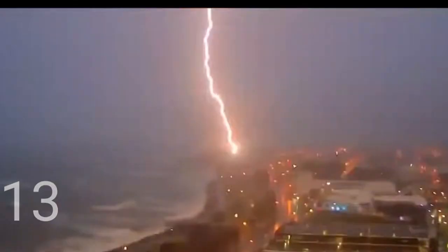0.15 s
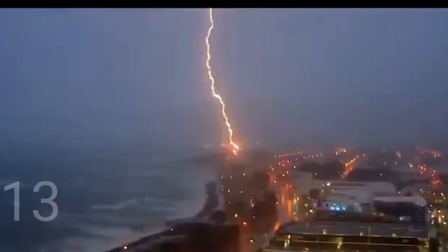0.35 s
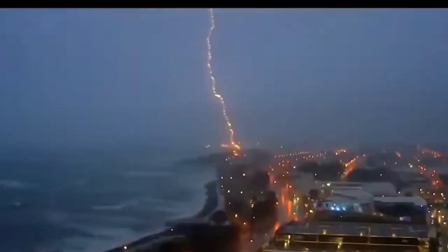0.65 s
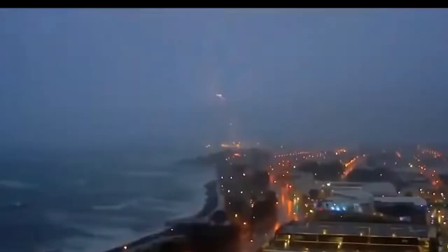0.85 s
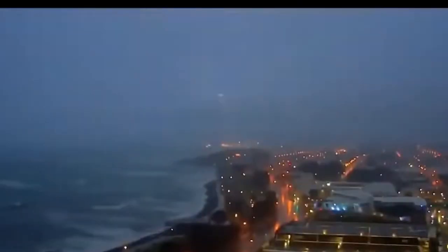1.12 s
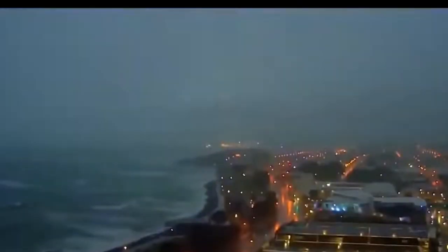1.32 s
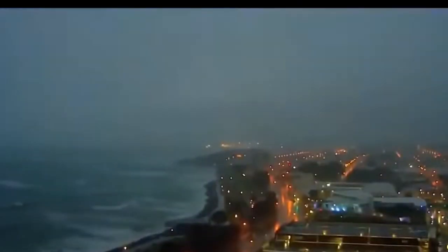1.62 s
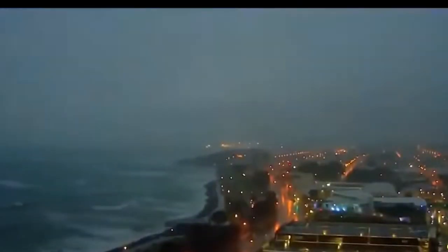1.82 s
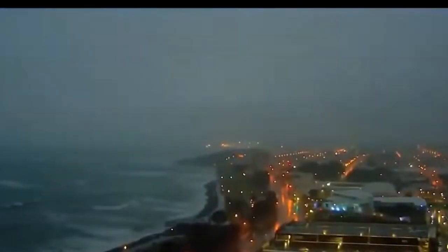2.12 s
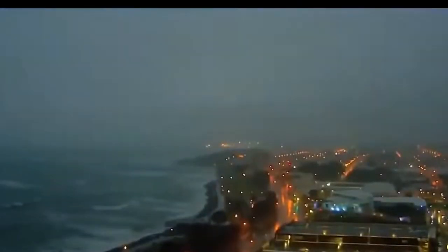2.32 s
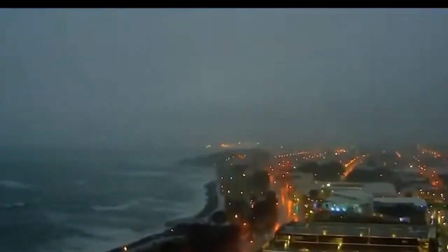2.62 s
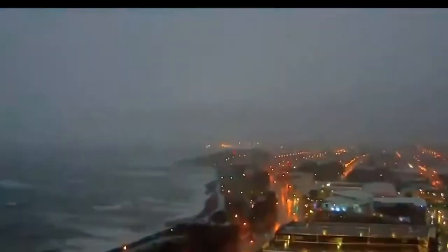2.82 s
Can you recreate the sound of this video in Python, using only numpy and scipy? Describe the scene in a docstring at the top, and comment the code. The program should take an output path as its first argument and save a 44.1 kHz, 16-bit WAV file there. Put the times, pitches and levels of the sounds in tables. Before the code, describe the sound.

Close thunder outdoors above a coastal city: near silence, a faint rustle, then an abrupt, tearing crack that overloads the microphone, followed by a deep continuous roll with irregular sharper cracks and thumps, drifting left to right.

```python
"""Thunder, close and at night: lightning strikes near a coastal city, and its crack overloads the microphone.
A faint rustle leads into the crack, a dense burst of random shock fronts. Shock waves from ever higher parts of
the channel follow as peals, lone N-shaped shocks and thumps, dulled by the air on their way; their direction
drifts from the left to the right. Buildings and ground scatter them into short echoes. Behind lie a steady roll
of weak shocks, a hiss returning from the city and the noise of the night air."""
import sys
import numpy as np
from scipy import signal
from scipy.fft import rfft, irfft
from scipy.io import wavfile
from scipy.ndimage import uniform_filter1d, map_coordinates

SR = 44100
rng = np.random.default_rng(int(sys.argv[2]) if len(sys.argv) > 2 else 0)


def pcm_store(signal):
    """Save signal as 16-bit PCM."""
    levels = np.round(np.clip(np.atleast_2d(signal), -1, 1) * 32767)
    wavfile.write(sys.argv[1], SR, levels.astype(np.int16).T)


N = 130095

# Levels of the sources are those ahead of the microphone's overload.
PEAL_PER_S, PEAL_SCATTER_DB = 1900, 2.5  # shock fronts per second and spread of their size, peals and roll
PORTS_S = 0.00046  # sound's travel time between the two microphone ports


def undb(db):
    """Decibels to gain."""
    return 10 ** (np.asarray(db) / 20)


def unit(x):
    """Scales a sound to unit power."""
    return x / np.sqrt(np.mean(x ** 2))


def times():
    """Time of every sample in seconds."""
    return np.arange(N) / SR


def curve(points):
    """Gain along (time [s], level [dB]) points, practically silent outside them."""
    return undb(np.interp(times(), *np.array(points).T, left=-200, right=-200))


def swell(peak_s, rise_s, fall_s):
    """A bell-shaped rise to 1 and an exponential fall."""
    t = times() - peak_s
    exponent = np.where(t < 0, -.5 * (t / rise_s) ** 2, -t / fall_s)
    return np.exp(np.maximum(exponent, -20))


def colour(x, points):
    """Minimum-phase filter along (frequency [Hz], level [dB per Hz]); keeps the power of white noise."""
    size = 4096
    hz, db = np.array(points).T
    f = np.maximum(np.fft.rfftfreq(size, 1 / SR), 1)
    magnitude = undb(np.interp(np.log(f), np.log(hz), db))
    # folding the cepstrum onto positive times makes the response causal
    cepstrum = irfft(np.log(magnitude))
    cepstrum[1:size // 2] *= 2
    cepstrum[size // 2 + 1:] = 0
    response = irfft(np.exp(rfft(cepstrum)))
    return signal.fftconvolve(x, response / np.linalg.norm(response))[:N]


def butter(x, hz, kind, order=2):
    """Low-pass or high-pass."""
    return signal.sosfilt(signal.butter(order, hz, kind, fs=SR, output="sos"), x)


def registers(x):
    """Splits a sound into boom, body, rattle and snap, each of unit power."""
    def steep(v, hz, kind):
        return butter(butter(v, hz, kind), hz, kind)

    bands = []
    for hz in (440, 967, 3080):  # borders between the four registers
        bands.append(unit(steep(x, hz, "low")))
        x = steep(x, hz, "high")
    return bands + [unit(x)]


def shock_train(per_s, scatter_db, points):
    """Shock fronts from the kinks of the channel, random in time, sign and size, at an evened-out level."""
    hits = rng.random(N) < per_s / SR
    signs = rng.choice([-1, 1], N)
    fronts = hits * signs * undb(scatter_db * rng.standard_normal(N))
    sound = colour(fronts, points)
    power = uniform_filter1d(uniform_filter1d(sound ** 2, size=1200), size=1200)
    return sound / np.sqrt(np.abs(power) + 1e-12)


def all_round(mid, side):
    """Sound from all directions at two ports: alike in the bass, unrelated in the treble."""
    size = 128
    alike = np.sinc(2 * PORTS_S * np.fft.rfftfreq(size, 1 / SR))

    def taps(share):
        return np.roll(irfft(np.sqrt(share / 2)), size // 2) * np.hanning(size + 1)[:-1]

    m = signal.fftconvolve(mid, taps(1 + alike))[:N]
    s = signal.fftconvolve(side, taps(1 - alike))[:N]
    return np.array([m + s, m - s])


def diffuse(points):
    """Coloured noise that arrives from all round."""
    mid, side = (colour(rng.standard_normal(N), points) for _ in range(2))
    return all_round(mid, side)


def tail(fall_s):
    """Dense reflections of unit energy that die away."""
    noise = all_round(*rng.standard_normal((2, N)))
    return unit(noise * np.exp(-times() / fall_s)) / np.sqrt(N)


def arrive(x, lead_s):
    """Sound from one direction reaches one port before the other."""
    left, right = (
        map_coordinates(x, [(times() + sign * lead_s / 2) * SR], order=3, mode="mirror") for sign in (1, -1)
    )
    return np.array([left, right])


def crack():
    """The nearest part of the channel: a rustle, then a dense burst of shocks torn by sparse sharp ones."""
    # loudness of the crack's dense body: (time [s], level [dB])
    crack_level = [(.2212, -38), (.2232, -10), (.27, -19.5), (.325, -15.5), (.355, -25.5), (.385, -46),
                   (.42, -60)]
    # spectrum of the body: (frequency [Hz], level [dB per Hz])
    crack_colour = [(25, -39), (70, -23), (115, -6), (170, 3.5), (225, -0.5), (300, 3), (500, -10),
                    (1200, -28.5), (2400, -33.5), (5000, -45.5), (10000, -42), (15000, -62)]
    # spectrum of the coarse crackle: (frequency [Hz], level [dB per Hz])
    crackle_colour = [(150, -29.5), (600, 4.5), (2200, -7), (4500, -14), (14000, -35)]
    # loudness of the faint rustle ahead of the crack: (time [s], level [dB])
    rustle_level = [(.095, -100), (.124, -71), (.131, -66), (.148, -62), (.175, -74.5), (.212, -64),
                    (.25, -63)]
    # spectrum of the rustle: (frequency [Hz], level [dB per Hz])
    rustle_colour = [(30, -14.5), (120, -23), (190, -8), (300, 1), (400, -12.5), (1200, -13.5),
                     (3000, -27.5), (4200, -37), (12000, -49)]
    per_s, scatter_db = 2000, 4  # shock fronts per second, spread of their size
    crackle_per_s, crackle_scatter_db, crackle_db = 120, 6.5, -11.5  # level relative to the body

    body = shock_train(per_s, scatter_db, crack_colour)
    crackle = undb(crackle_db) * shock_train(crackle_per_s, crackle_scatter_db, crackle_colour)
    rustle = shock_train(per_s, scatter_db, rustle_colour)
    return curve(crack_level) * (body + crackle) + curve(rustle_level) * rustle


def peals():
    """Each bend of the channel sends a cluster of shocks with its own weight and brightness."""
    # clusters: (time of the peak [s], rise [s], fall [s], boom [dB], body [dB], rattle [dB], snap [dB])
    clusters = [ (0.2363, 0.0017, 0.0052, -40, -30.5, -35.5, -27),
                (0.261, 0.0039, 0.0088, -53, -40, -29, -44), (.297, 0.0017, 0.0044, -51, -37, -29.5, -48),
                (0.327, 0.003, 0.0096, -42, -24.5, -29, -31.5),
                (0.384, 0.029, 0.028, -31.5, -40.5, -47, -61), (0.44, 0.013, 0.02, -29.5, -38.5, -45, -63),
                (.488, 0.0054, 0.015, -35.5, -46, -49.5, -59.5), (0.554, 0.02, 0.048, -59, -52.5, -66, -83),
                (0.704, 0.0019, 0.067, -54, -50, -52.5, -64),
                (0.826, 0.0097, 0.057, -52, -47.5, -51.5, -88),
                (0.883, 0.01, 0.031, -46, -52.5, -48.5, -63.5), (1.031, 0.015, 0.017, -48, -56, -61, -73),
                (1.136, 0.03, 0.12, -66, -55.5, -61.5, -74),
                (1.196, 0.013, 0.072, -55.5, -50.5, -55.5, -76.5),
                (1.28, 0.023, 0.05, -42, -47.5, -57.5, -80), (1.301, 0.013, 0.016, -54, -50, -46.5, -66.5),
                (1.375, 0.011, 0.035, -50, -51.5, -56.5, -74.5),
                (1.412, 0.012, 0.057, -45.5, -50, -61.5, -89),
                (1.435, 0.0086, 0.0087, -51, -48, -48.5, -73.5), (1.565, 0.01, 0.12, -57.5, -57, -73, -99),
                (1.681, 0.002, 0.022, -56.5, -47, -63, -100), (1.714, 0.0096, 0.024, -53, -46, -66.5, -100),
                (1.807, 0.011, 0.055, -43, -48, -56.5, -73.5),
                (1.9051, 0.00067, 0.0028, -40, -32.5, -47, -68),
                (1.918, 0.004, 0.017, -44, -45.5, -50.5, -57.5),
                (2.061, 0.0055, 0.027, -56.5, -67, -65.5, -76),
                (2.102, 0.0025, 0.055, -45.5, -47.5, -59.5, -78),
                (2.232, 0.02, 0.045, -46.5, -46.5, -57.5, -77),
                (2.467, 0.0035, 0.062, -43, -50.5, -57, -78), (2.534, 0.016, 0.091, -53, -54, -62.5, -84),
                (2.663, 0.033, 0.088, -53, -55, -62.5, -92), (2.905, 0.018, 0.015, -54, -55.5, -74, -95), ]
    # spectrum within the registers: (frequency [Hz], level [dB per Hz])
    peal_colour = [(20, -46), (40, -37.5), (72, -5.5), (105, 0), (150, 4.5), (290, 2), (480, -3.5),
                   (700, -10), (1400, -21), (2800, -32.5), (6000, -41.5), (10000, -53.5), (15000, -65.5)]
    shapes = np.array([swell(*row[:3]) for row in clusters])
    # overlapping clusters add in power, register by register
    power = undb([row[3:] for row in clusters]).T ** 2 @ shapes ** 2
    bands = registers(shock_train(PEAL_PER_S, PEAL_SCATTER_DB, peal_colour))
    return (np.sqrt(power) * bands).sum(axis=0)


def lone_shocks():
    """N-shaped pressure waves that stand out, their edges rounded by the air."""
    # waves before the rounding: (start [s], peak level [dB], length [s])
    n_waves = [(.7145, -40, .003), (.7335, -36, .002), (.8225, -38, .0015), (.9335, -39, .003),
               (1.231, -38, .003), (1.418, -34, .003), (1.672, -35, .005), (1.7215, -32, .0025),
               (1.7935, -32, .0045), (1.9042, -28, .0026), (1.9115, -33, .002), (2.1018, -34, .002),
               (2.239, -34, .002), (2.4872, -34, .0015)]
    soft_hz, low_hz = 1310, 143  # treble and bass limits
    out = np.zeros(N)
    for start_s, db, length_s in n_waves:
        along = (times() - start_s) / length_s
        inside = (along >= 0) & (along < 1)
        out += undb(db) * (1 - 2 * along) * inside
    return butter(butter(out, soft_hz, "low"), low_hz, "high", order=1)


def thumps():
    """A few long, uneven pressure waves in a row make a thump; its pitch slides as their spacing changes."""
    # compact thumps: (time of the peak [s], rise [s], fall [s], level [dB], pitch at the peak [Hz],
    # glide [octaves per s])
    thump_rows = [ (.275, .02, 0.02, -34.5, 74, -0.5), (0.342, .011, 0.0099, -21, 79.3, -14),
                  (0.45, .012, 0.014, -46, 179.8, -4.5), (.497, .016, 0.039, -47, 74.2, -2.5),
                  (0.656, .025, 0.047, -53, 98, 2.5), (.701, .011, 0.012, -42.5, 162, 2.5),
                  (.735, .015, 0.045, -49, 87.8, -1.5), (.775, .022, 0.041, -47.5, 371.3, -2),
                  (.883, .006, 0.021, -41.5, 151, 1.5), (0.888, .011, 0.019, -41, 346.1, -1.5),
                  (1.275, .013, 0.031, -41, 163.1, 3), (1.29, .014, 0.027, -47, 81.3, -2),
                  (1.421, .012, 0.034, -44.5, 250.2, -3), (1.479, .02, 0.02, -59, 72.3, -1.5),
                  (1.68, .01, 0.034, -48.5, 188.6, 11.5), (1.726, .014, 0.024, -43.5, 283.7, 5),
                  (1.809, .009, 0.017, -42.5, 150.5, 16), (1.836, .009, 0.011, -40.5, 230.7, 2.5),
                  (2.126, .008, 0.022, -39.5, 168.5, -0.5), (2.223, .018, 0.069, -48, 138.3, -1),
                  (2.535, .016, 0.025, -40, 207.6, 0.5), ]
    jitter, scatter_db = 0.086, 3.5  # unevenness from wave to wave: timing in cycles, size in dB
    out, t = np.zeros(N), times()
    for peak_s, rise_s, fall_s, db, hz, glide in thump_rows:
        near = (t > peak_s - 4 * rise_s) & (t < peak_s + 5 * fall_s)
        pitch_hz = hz * 2 ** (glide * (t[near] - peak_s))
        cycles = rng.random() + np.cumsum(pitch_hz) / SR
        # one random timing and size per cycle, joined by straight lines
        draws = rng.standard_normal(size=(2, 128))
        early, size = (np.interp(cycles, np.arange(len(row)), row) for row in draws)
        waves = np.sqrt(2) * np.sin(2 * np.pi * (cycles + jitter * early))
        out[near] += undb(db + scatter_db * size) * swell(peak_s, rise_s, fall_s)[near] * waves
    return out


def near_echoes(x):
    """Nearby surfaces smear every shock with a short tail, thin in the bass."""
    echo_db, fall_s, low_hz = -4, 0.028, 550  # tail level ahead of the bass cut, fall to 1/e, bass cut
    response = butter(tail(fall_s), low_hz, "high", order=1)
    return undb(echo_db) * signal.fftconvolve(x[None], response, axes=1)[:, :N]


def roll():
    """Countless weak shocks from all round; the boom slowly weakens while the higher registers slowly grow."""
    # one row each for boom, body, rattle and snap: (level at the start [dB], fall [dB per s], negative = growth)
    roll_levels = [(-54.5, 0.54), (-60.5, -0.85), (-65, -0.5), (-78.5, -0.5)]
    # spectrum within the registers: (frequency [Hz], level [dB per Hz])
    roll_colour = [(20, -39), (42, -29), (75, -3), (200, 2), (330, -0.5), (600, -5.5), (1500, -17),
                   (2700, -26.5), (5000, -40), (9000, -56.5), (15000, -69)]
    start_s, rise_s = 0.33, 0.097
    age = np.maximum(times() - start_s, 0)
    mid, side = (shock_train(PEAL_PER_S, PEAL_SCATTER_DB, roll_colour) for _ in range(2))
    bands = registers(all_round(mid, side))
    field = sum(band * undb(db - fall * age) for band, (db, fall) in zip(bands, roll_levels))
    return np.minimum(age / rise_s, 1) * field


def wash():
    """The crack returns from the city as a hiss from all round that builds up and fades."""
    # spectrum of the returning sound: (frequency [Hz], level [dB per Hz])
    wash_colour = [(30, -17), (80, -5), (300, 7.5), (1300, -3), (2500, -6), (4000, -11), (7000, -27.5),
                   (11000, -35.5), (15000, -56)]
    start_s, rise_s, fall_s = .23, 0.31, 0.49
    age = np.maximum(times() - start_s, 0)
    envelope = (1 - np.exp(-age / rise_s)) * np.exp(-age / fall_s)
    return undb(-47) * envelope * diffuse(wash_colour)


def night_air():
    """Steady faint noise from all round."""
    # spectrum of the air: (frequency [Hz], level [dB per Hz])
    air_colour = [(30, -10), (110, -3), (400, -7.5), (1200, -11), (3000, -15), (7000, -16.5), (15000, -16)]
    return undb(-80.5) * diffuse(air_colour)


def sheen(x):
    """A thin, bright reverberation smears the overloaded sound and lets its treble linger."""
    # spectrum of the reverberation: (frequency [Hz], level [dB per Hz])
    sheen_colour = [(1000, -4.5), (1900, 1), (3000, -3), (6000, -3), (10000, 5), (15000, -6.5)]
    # tail levels ahead of the bass cut, falls to 1/e
    late_db, late_fall_s, early_db, early_fall_s = -6, 0.17, -5.5, .016
    response = undb(late_db) * tail(late_fall_s) + undb(early_db) * tail(early_fall_s)
    response = butter(response, 1400, "high", order=3)
    coloured = [colour(side, sheen_colour) for side in response]
    return signal.fftconvolve(x, coloured, axes=1)[:, :N]


def scene():
    """Direct thunder and its near echoes over the roll, the wash and the night air."""
    # direction of the thunder: (time [s], lead of the left port [ms])
    lead_points = [(.2, 0.37), (1.25, 0.36), (1.502, 0.25), (1.8, 0.25), (2.1, -0.12), (2.499, -0.1),
                   (2.95, -0.36)]
    thunder = crack() + peals() + lone_shocks() + thumps()
    lead_s = np.interp(times(), *np.array(lead_points).T) / 1000
    direct = arrive(thunder, lead_s)
    return direct + near_echoes(thunder) + roll() + wash() + night_air()


def record(dry):
    """The microphone overloads and flattens the crack; the edges are softened and smeared, the top is cut."""
    overload_db, knee = -32, 2.65  # ceiling of the output, sharpness of the bend towards it
    edge_hz, top_hz = 2510, 14800  # gentle softening, steep cut
    clipped = dry / (1 + np.abs(dry / undb(overload_db)) ** knee) ** (1 / knee)
    soft = butter(clipped, edge_hz, "low", order=1)
    top_cut = signal.ellip(8, .2, 70, top_hz, fs=SR, output="sos")
    return signal.sosfilt(top_cut, soft + sheen(soft))


dry = scene()
out = record(dry)
pcm_store(out)
```